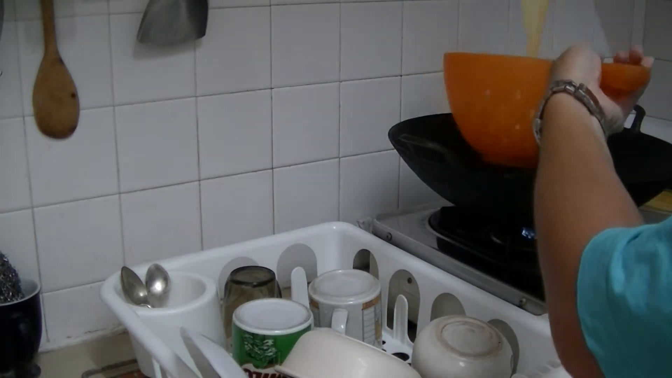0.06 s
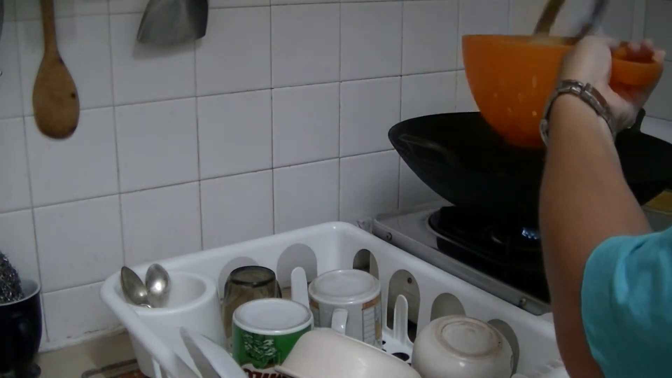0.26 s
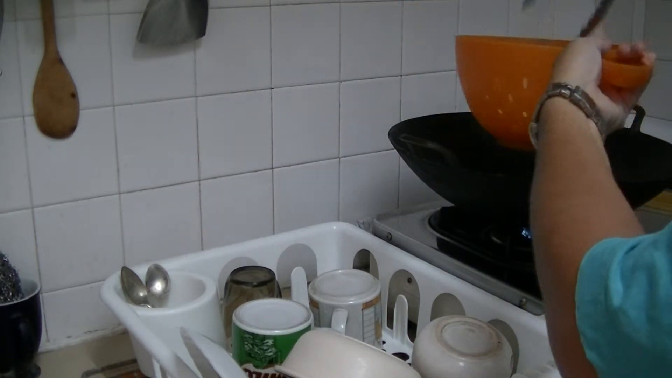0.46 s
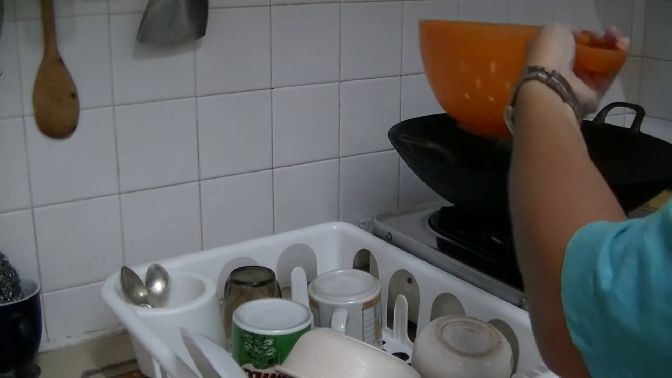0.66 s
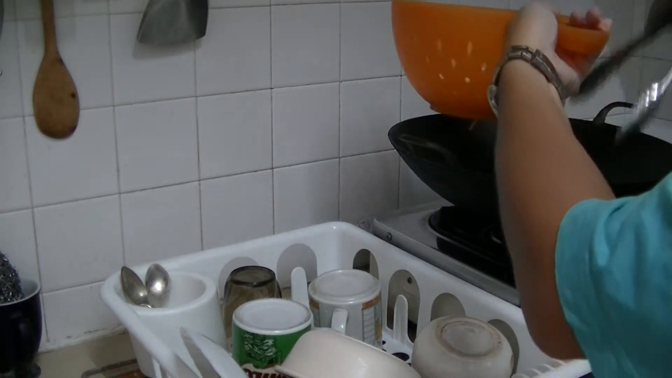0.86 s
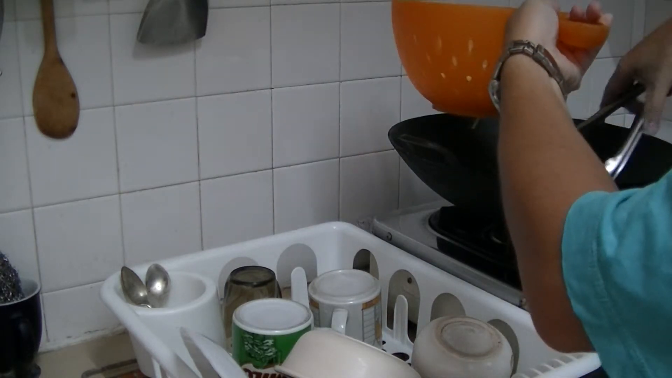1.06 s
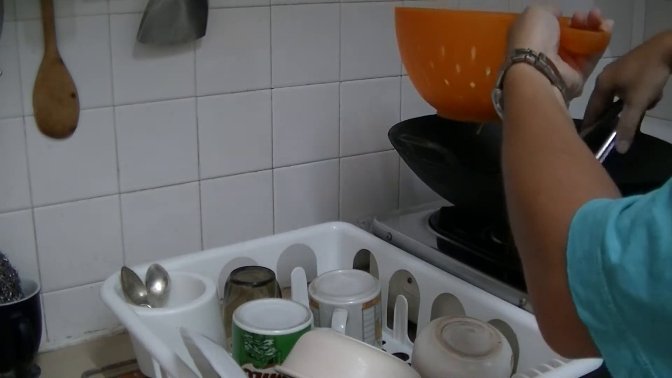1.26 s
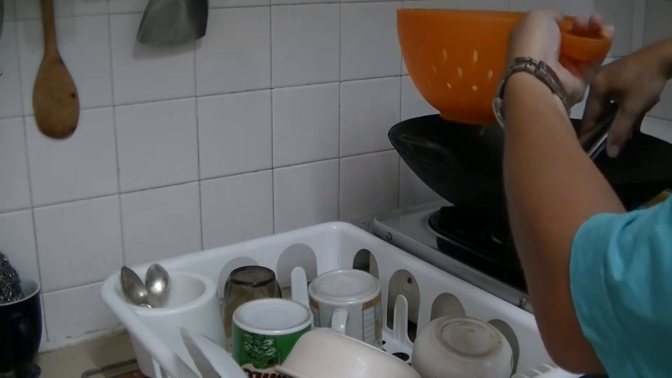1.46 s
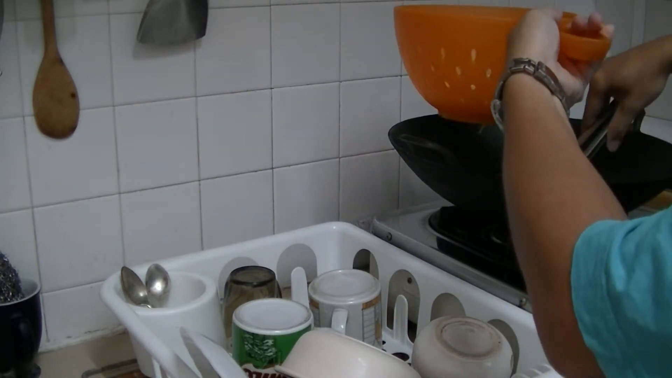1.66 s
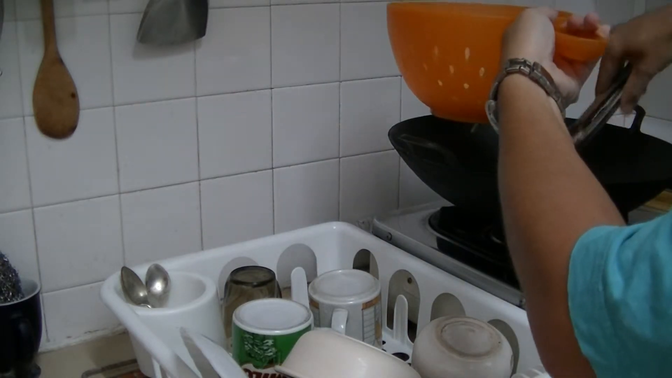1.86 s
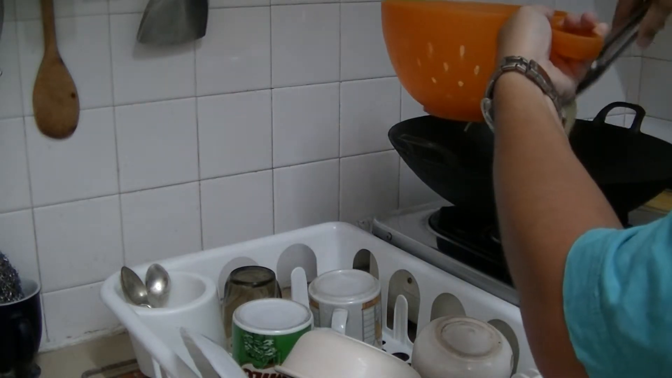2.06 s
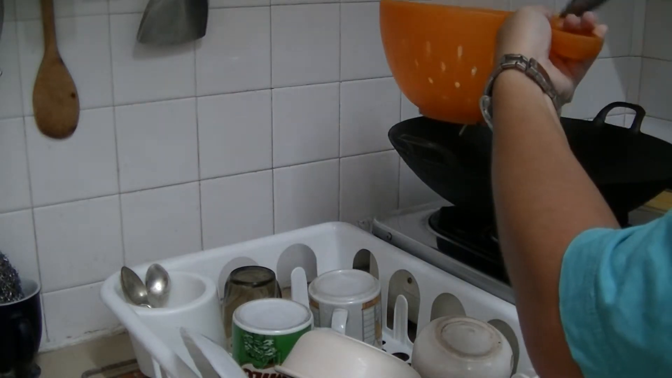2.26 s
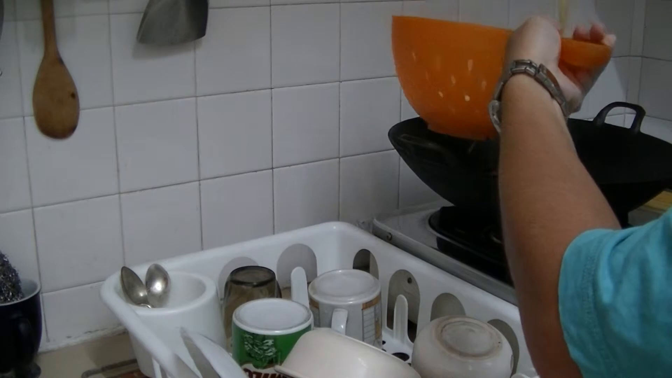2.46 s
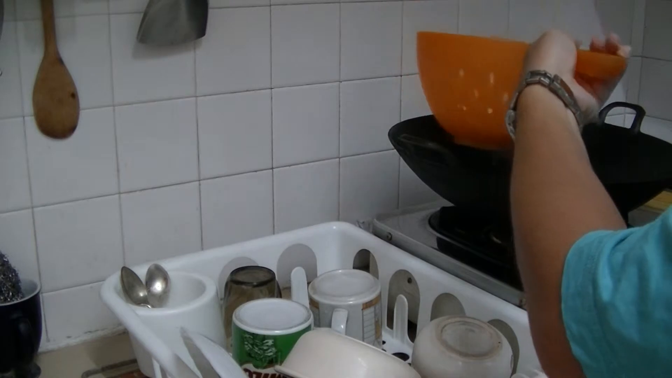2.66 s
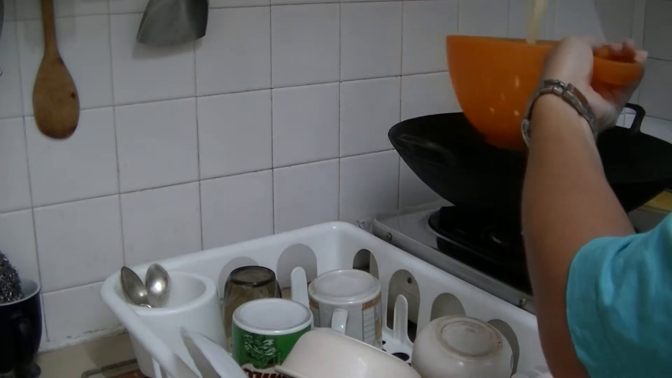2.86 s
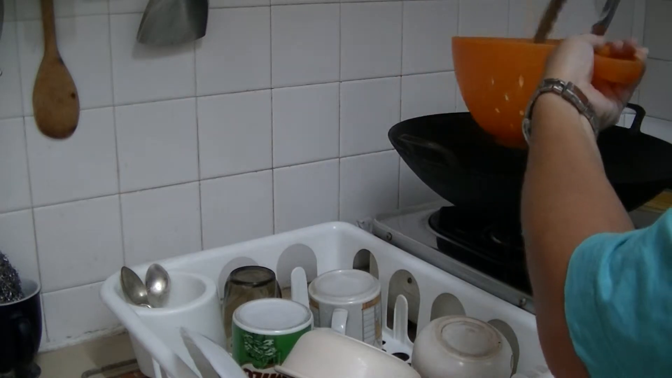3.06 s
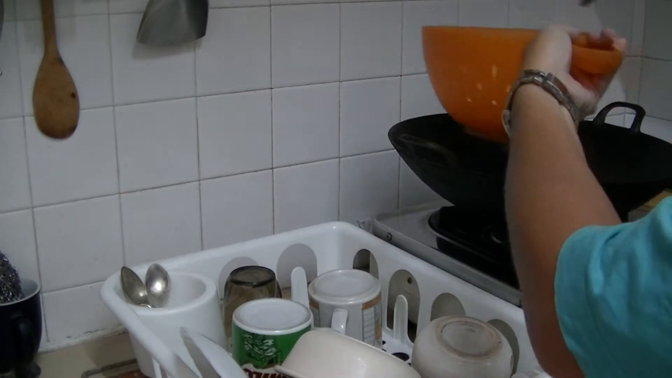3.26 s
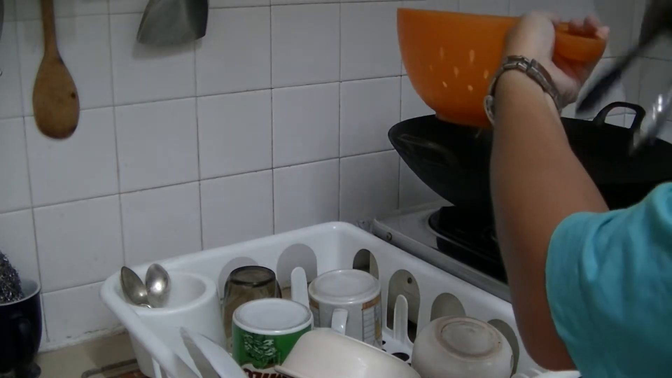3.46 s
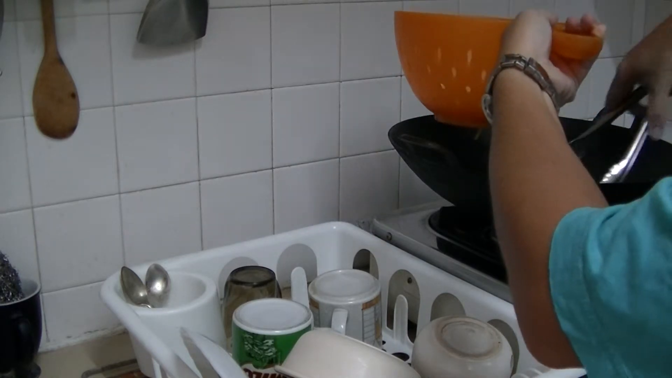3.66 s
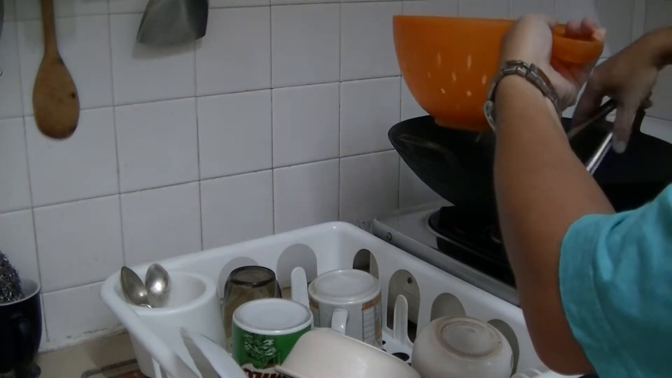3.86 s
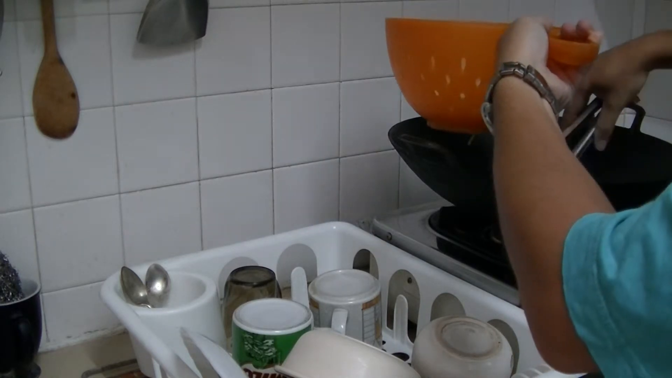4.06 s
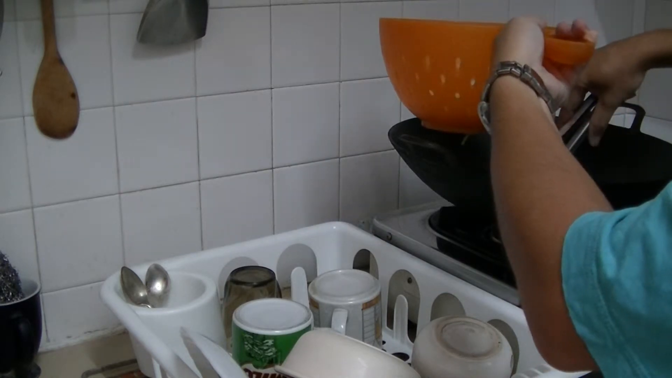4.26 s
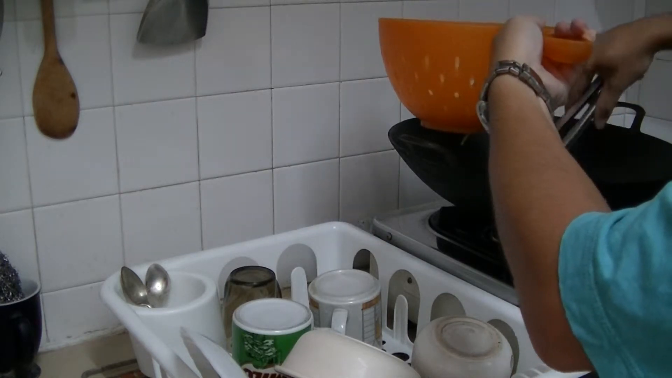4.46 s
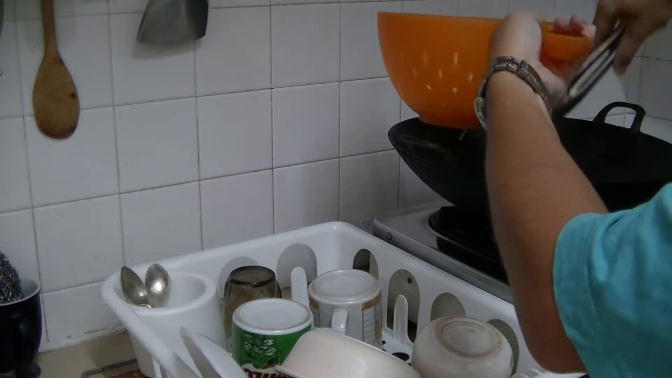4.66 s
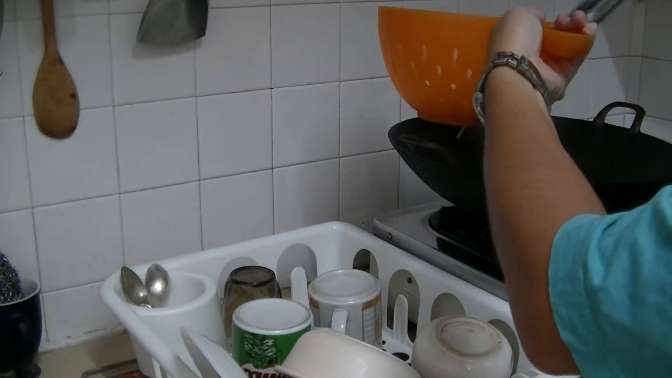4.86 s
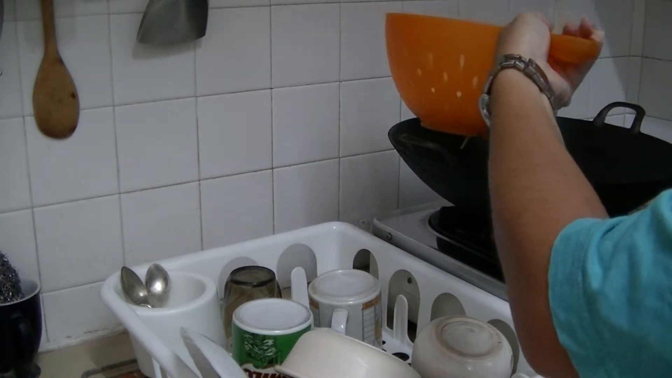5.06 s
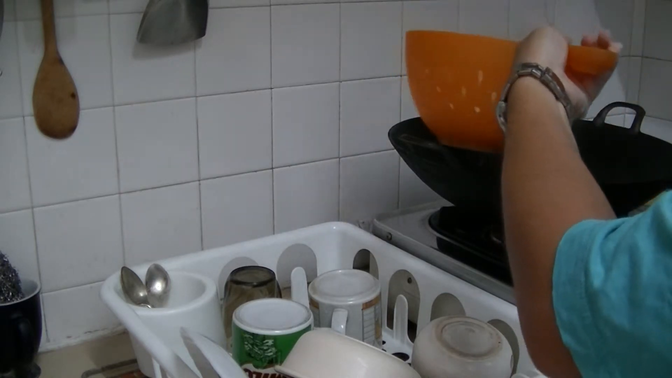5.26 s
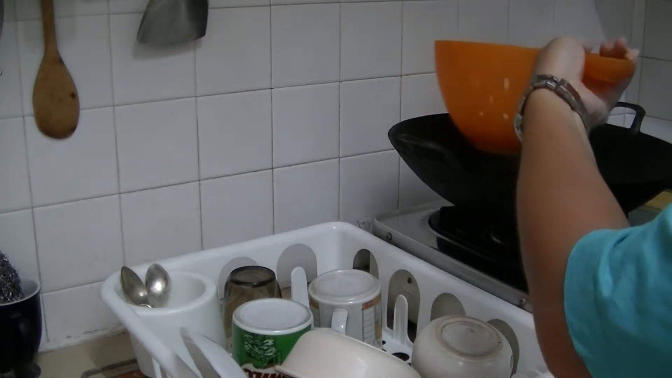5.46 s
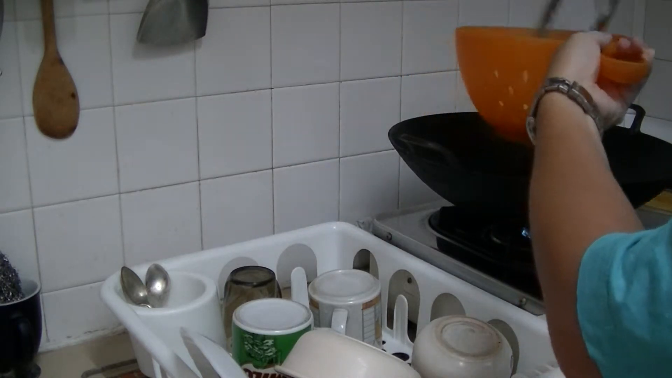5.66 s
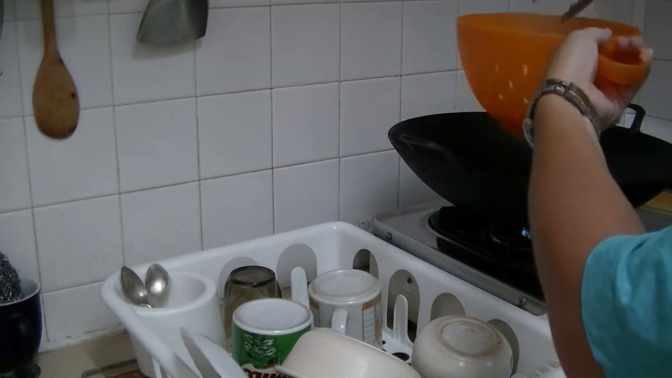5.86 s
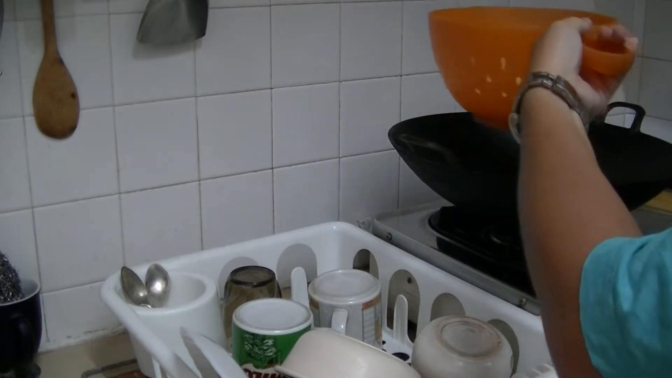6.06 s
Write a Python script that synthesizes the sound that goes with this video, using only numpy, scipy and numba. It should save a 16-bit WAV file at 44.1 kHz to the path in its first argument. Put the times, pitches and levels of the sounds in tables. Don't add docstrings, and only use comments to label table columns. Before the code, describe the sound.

Steel tongs strike an iron wok and scrape harshly down its wall twice, with light ticks and plastic knocks over a quiet kitchen simmer.

```python
import sys
import numpy as np
from scipy import signal
from scipy.fft import rfft, irfft
from scipy.io import wavfile
from scipy.ndimage import uniform_filter1d
from numba import njit

SR = 44100
rng = np.random.default_rng(int(sys.argv[2]) if len(sys.argv) > 2 else 0)


def to_wav(sig):
    pcm = np.clip(np.atleast_2d(sig), -1, 1) * 32767
    pcm = np.round(pcm).astype(np.int16)
    wavfile.write(sys.argv[1], SR, pcm.T)


def how_loud(loudness_db):
    steps = np.asarray(loudness_db, float) / 20
    return 10 ** steps


N = 269705


def rms_one(x):
    return x / np.sqrt(np.mean(x ** 2) + 1e-20)


def at_hz(points, hz):
    table = np.array(points)
    return np.interp(np.log(hz), np.log(table[:, 0]), table[:, 1])


def drift(rate_hz):
    pole = np.exp(-80 * np.pi * rate_hz / SR)
    white = rng.standard_normal(N // 40 + 2002)
    slow = signal.lfilter([1], [1, -2 * pole, pole * pole], white)[2000:]
    return np.interp(np.arange(N) / 40, np.arange(len(slow)), rms_one(slow))


def ring(clicks, hz, t60_s):
    pole = how_loud(-60 / (t60_s * SR))
    angle = 2 * np.pi * hz / SR
    return signal.lfilter([0, np.sin(angle)], [1, -2 * pole * np.cos(angle), pole * pole], clicks + 1e-18)


def resonances(x, peaks, patchy_db):
    total = 0
    for k, (hz, width_hz, level_db) in enumerate(peaks):
        t60_s = np.log(1000) / (np.pi * width_hz)
        patchy = x * how_loud(patchy_db * drift(6.9))
        total = total + (-1) ** k * how_loud(level_db) * np.sqrt(width_hz) * ring(patchy, hz, t60_s)
    return rms_one(total)


@njit
def gliding(x, c, r):
    y = np.zeros(len(x))
    for i in range(2, len(x)):
        y[i] = x[i] - x[i - 2] + 2 * r * c[i] * y[i - 1] - r * r * y[i - 2]
    return y


def glide(x, hz, width_hz):
    return rms_one(gliding(x, np.cos(2 * np.pi * hz / SR), np.exp(-np.pi * width_hz / SR)))


def bands(white, spectrum):
    edges = 16400 * 2 ** np.arange(-9.67, .1, 1 / 3)
    for k, (low, high) in enumerate(zip(edges, edges[1:])):
        hz = np.sqrt(low * high)
        if spectrum[0][0] < hz < spectrum[-1][0]:
            sos = signal.butter(2, [low, high], "band", fs=SR, output="sos")
            yield hz, how_loud(at_hz(spectrum, hz)) * signal.sosfilt(sos, white[k % 2])


def grains(per_s, spread_db):
    sizes = how_loud(spread_db * np.minimum(rng.exponential(1, N), 5)) * rng.choice([-1, 1], N)
    return rms_one(sizes * (rng.random(N) < per_s / SR))


def blow(hits, modes, ring_db, crack_db):
    # pitch_hz, density_db_per_hz
    crack_spectrum = [(180, -65), (300, -19), (828, -24.5), (1640, -26), (2880, -7.5), (3130, -7),
                      (3460, -5), (4090, -5), (4910, -5), (7570, -6), (16000, -13)]
    # pitch_hz, t60_s
    crack_t60 = [(500, 0.23), (2000, 0.25), (5000, 0.18), (12000, 0.043)]
    out, t = np.zeros(N), np.arange(SR // 2) / SR
    for start_s, peak_db, contact_s, hard_hz, damp_db in hits:
        chatter = np.exp(-2 * t / contact_s) * (rng.random(len(t)) < .03)
        chatter[0] = 1
        body = 0
        for hz, level_db, t60_s in modes:
            tone = ring(chatter * rng.standard_normal(len(t)), hz, t60_s)
            body = body + how_loud(level_db) * tone / np.abs(tone).max()
        white = rng.standard_normal((2, len(t)))
        crack = sum(b * how_loud(-60 * t / at_hz(crack_t60, hz)) for hz, b in bands(white, crack_spectrum))
        rise = 1 - np.exp(-t / 0.00099)
        mix = how_loud(ring_db) * body + how_loud(crack_db) * rise * crack / np.abs(crack).max()
        dulled = signal.lfilter(*signal.butter(2, min(hard_hz, 19000), fs=SR), mix)
        at = int(start_s * SR)
        out[at:at + len(t)] += how_loud(peak_db - damp_db * t) * dulled
    return out


def wok_blows():
    # start_s, peak_db, contact_s, hardness_hz, hand_damping_db_per_s
    first_place = [
        (1.138, -7, 0.015, 11700, 3),
        (1.2805, -15, 0.0026, 6250, 330),
    ]
    second_place = [
        (3.574, -6.5, 0.012, 12300, 0),
    ]
    # pitch_hz, level_db, t60_s
    first_modes = [(615, -14.5, 0.12), (683, -16.5, 0.089), (835, -13, 0.12), (1360, -28, 0.13),
                   (1990, -12, 0.076), (2287, -1.5, 0.066), (2600, -13, 0.16), (2805, -5, 0.11),
                   (3025, -14, .2), (3321, -9, .3), (3380, -8, .15), (3575, -3, .25), (3661, -8, .26),
                   (3801, -4, .29), (3869, -6, .2), (4167, -6, .3), (4430, -6, .2), (4522, -4, .12),
                   (4770, -6, .25), (5044, -10, .3), (5416, -10, .3), (5647, -11, .2), (6185, -14, .15),
                   (6670, -16, .15), (7246, -14, .18), (7424, -17, .18), (7725, -18, .16), (8129, -17, .16),
                   (8543, -29, 0.22), (9000, -31, 0.22)]
    second_modes = [(800, -26, .08), (1450, -26, .08), (2492, -18, .15), (2622, -22, .3), (3025, -16, .24),
                    (3553, -3, .16), (3644, -13, .25), (3795, -5.5, .22), (3870, -13, .2), (4140, -15, .17),
                    (4425, -20, .2), (4732, -14, .22), (4775, -12, .35), (4996, -5, .25), (5075, -9, .22),
                    (5125, -16, .3), (5362, -18, .3), (5599, -22, .3), (5862, -24, .25), (6078, -18, .12),
                    (6255, -12, .1), (7004, -24, .25), (7483, -20, .15), (7811, -22, .23), (8603, -22, .2),
                    (10060, -26, .18), (10650, -30, .2), (11280, -26, .11)]
    first = blow(first_place, first_modes, ring_db=-14.0, crack_db=-2)
    return first + blow(second_place, second_modes, ring_db=-9.5, crack_db=-3.0)


def bowl():
    # start_s, level_db, pitch_hz, t60_s
    low_rings = [
        (3.61, -53.5, 277, 1.1),
        (1.27, -56, 280, 0.39),
        (2.497, -55, 670, .25),
    ]
    t, out = np.arange(N) / SR, 0
    for start_s, level_db, hz, t60_s in low_rings:
        since = np.maximum(t - start_s, 0)
        swell = how_loud(level_db - 60 * since / t60_s) * (1 - np.exp(-since / 0.01))
        out = out + swell * np.sin(2 * np.pi * hz * since)
    return out


def stroke():
    # touch_s, bottom_s
    strokes = [
        (1.168, 1.456),
        (3.66, 4.02),
    ]
    # start_s, pressure_db, arm_share_db, spring_share_db
    catches = [(1.175, -30, -4, -17), (1.215, -36, 6, -11), (1.243, -49, 1, -8), (1.286, -31, 5.5, -24),
               (1.33, -39.5, -7, -20), (1.36, -38.5, -4, -12), (1.423, -34, 1.5, -7), (1.49, -46, 2, -5),
               (1.625, -52, 0, -1), (3.665, -35.5, -22, -13), (3.702, -32, 2, -8.5),
               (3.733, -27, -6.5, -26), (3.79, -33.5, -2, -16), (3.86, -31, 3.5, -14.5),
               (3.92, -39.5, -3, -5.5), (3.99, -34, -6, -9), (4.02, -35.5, 3.5, -12), (4.1, -44, -4, -0.5),
               (4.235, -51, -1.5, -15)]
    bite_db_per_s, ease_db_per_s = 498, 122
    lift_db_per_s = 58
    tong_damp_db_per_s = 132
    t = np.arange(N) / SR
    latest = strokes[::-1]
    begun = [t > start for start, _ in latest]
    way = np.select(begun, [(t - start) / (end - start) for start, end in latest])
    past = np.select(begun, [np.maximum(t - end, 0) for _, end in latest])
    s, pressure_db, arm_db, spring_db = np.transpose(catches)[:, :, None]
    fall_db = np.maximum(bite_db_per_s * (s - t), ease_db_per_s * (t - s))
    lift_db = lift_db_per_s * np.clip(np.minimum(past, t - s), 0, 1)
    grip = how_loud(pressure_db - fall_db - lift_db)
    held = np.select(begun, [s > start for start, _ in latest])
    damp_db = tong_damp_db_per_s * np.maximum(t - s, 0)
    shares_db = (0, arm_db - damp_db, spring_db - damp_db)
    pressures = [np.sqrt(np.sum((held * grip * how_loud(share)) ** 2, axis=0)) for share in shares_db]
    return np.clip(way, 0, 1), [uniform_filter1d(p, size=200) for p in pressures]


def drags():
    # pitch_hz, width_hz, level_db
    wall_peaks = [(1070, 14, -28), (1490, 83, -10.5), (1583, 34, -19), (2596, 37, -8), (2880, 60, -20),
                  (3100, 74, -19), (3127, 47, -4), (3347, 74, 0), (3350, 14, -6), (3640, 50, -5),
                  (3810, 60, -10), (4000, 60, -6), (4180, 60, -4), (4400, 60, -7), (4520, 50, -7),
                  (4760, 50, -5), (5020, 50, -8), (5200, 70, -10), (5430, 70, -10), (5650, 90, -13),
                  (5950, 90, -12), (6300, 90, -13), (6630, 90, -13), (6930, 70, -13), (7040, 140, -7.5),
                  (8000, 140, -31), (8900, 160, -14)]
    # pitch_hz, density_db_per_hz
    grit_spectrum = [(180, -74), (300, -23), (425, -24), (787, -9.5), (930, -9), (1660, -32), (2250, -13),
                     (2650, -0.5), (5610, -7.5), (11500, -25.5), (16000, -55)]
    way, (grit, on_arm, on_spring) = stroke()
    tremor = drift(23)
    arm_hz = (2333 - 220 * way ** 2.15) * (1 + 0.0098 * tremor)
    spring_hz = 870 - 165 * way
    slips = []
    for _ in range(2):
        fine = grains(9000, spread_db=1.0) * how_loud(2.4 * drift(18))
        rattle = grains(130, spread_db=4.5)
        slips.append(fine + how_loud(-9) * rattle)
    pressed = grit * slips[0]
    broad = rms_one(sum(b * how_loud(1.3 * drift(12)) for hz, b in bands(slips, grit_spectrum)))
    wall = resonances(pressed, wall_peaks, patchy_db=3) * np.sqrt(np.mean(pressed ** 2))
    arm = glide(glide(slips[0], arm_hz, width_hz=270), arm_hz, width_hz=160) * how_loud(2.4 * tremor)
    arm = arm + 0.35 * glide(slips[1], arm_hz * 1.07, width_hz=20)
    spring = glide(slips[1], spring_hz, width_hz=100)
    tongs = how_loud(-3.0) * on_arm * arm + how_loud(-3.5) * on_spring * spring
    return how_loud(-7.0) * wall + how_loud(-3.5) * grit * broad + tongs


def ticks():
    # start_s, peak_db, centre_hz
    tip_ticks = [(.25, -46, 7000), (.34, -45, 8000), (0.442, -37.5, 6200), (2.517, -35.5, 6500),
                 (2.59, -43, 11000), (3.1835, -31, 6800), (4.977, -54, 7000), (5.01, -38, 5300),
                 (5.1804, -41.5, 7400), (5.31, -49, 12000), (5.6597, -28.5, 5600), (5.6603, -35, 13500)]
    rim_ticks = [(2.3925, -33, 2220), (2.668, -42, 2410), (3.0218, -37, 4500), (4.225, -37, 2980),
                 (4.259, -39, 4000)]
    colander_knocks = [(2.495, -48, 760), (2.552, -40, 2360), (2.63, -54, 2100), (4.9761, -33, 3100),
                       (5.045, -43.5, 1600), (5.799, -49, 320)]
    # spread_octaves, t60_s
    touch_kinds = [
        (0.57, 0.1),
        (.68, 0.081),
        (0.24, .11),
    ]
    out, t = np.zeros(N), np.arange(SR // 4) / SR
    octaves = np.log2(np.arange(len(t) // 2 + 1) * SR / len(t) + 1)
    first_touch = 11.1 * (np.arange(len(t)) == SR // 1000)
    for touches, (spread, t60_s) in zip((tip_ticks, rim_ticks, colander_knocks), touch_kinds):
        for start_s, peak_db, hz in touches:
            colour = np.exp(-.5 * ((octaves - np.log2(hz)) / spread) ** 2) + 0.017 * (octaves > np.log2(500))
            touch = rng.standard_normal(len(t)) + first_touch
            snap = irfft(rfft(touch) * colour, len(t))
            snap = snap * how_loud(-60 * t / t60_s) * (1 - np.exp(-t / 0.0014))
            at = int(start_s * SR)
            out[at:at + len(t)] += (how_loud(peak_db) * snap / np.abs(snap).max())[:N - at]
    return out


def tip_snaps():
    # start_s, level_db
    snaps = [
        (3.1837, -43),
        (5.6597, -34.5),
    ]
    # pitch_hz, level_db, t60_s
    tip_modes = [(3800, -2, .035), (5200, -5, .035), (6110, 0, .045), (6390, -2, .07), (8600, -10, .08),
                 (9470, -8, .05)]
    out = np.zeros(N)
    for hz, mode_db, t60_s in tip_modes:
        clicks = np.zeros(N)
        for start_s, level_db in snaps:
            clicks[int(start_s * SR)] = how_loud(level_db + mode_db + rng.normal(0, 1))
        out += ring(clicks, hz, t60_s)
    return out


def stove():
    # pitch_hz, density_db_per_hz
    rumble_spectrum = [(12, -48), (20, -14), (168, -15), (240, -8), (290, -6.5), (312, 0), (343, -4),
                       (615, -1.5), (1210, -9), (1800, -14), (2340, -49), (3960, -120)]
    # pitch_hz, density_db_per_hz
    simmer_spectrum = [(650, -13), (1100, -1), (1200, -12), (1660, -4), (2160, -1.5), (2730, -10),
                       (3050, -0.5), (4150, -6), (4540, -8.5), (6320, -12), (15500, -25)]
    # pitch_hz, width_hz, level_db
    singing_peaks = [(2067, 40, 4.5), (2254, 53, 3), (2448, 6, 0), (2626, 20, -1.5), (3133, 23, 1),
                     (3430, 15, 2.5), (3890, 43, -3), (4400, 60, -1), (4670, 42, -11), (5420, 36, -3),
                     (5800, 130, -11), (7450, 64, -8.5)]
    # time_s, level_db
    vigour = [(0, -56), (1.5, -54.5), (3, -54.5), (3.5, -53), (4.4, -54.5), (5.3, -55), (6.12, -53)]
    t = np.arange(N) / SR
    rumble_db = -57.5 - 4.5 * (1 - np.exp(-t / 3))
    simmer_db = np.interp(t, *np.transpose(vigour))
    singing = resonances(grains(3000, spread_db=5.5), singing_peaks, patchy_db=1.0)
    simmer = bed_noise(simmer_spectrum, patchy_db=2.1) + how_loud(-5) * singing
    rumble = bed_noise(rumble_spectrum, patchy_db=1.1) * how_loud([[.6], [-.6]])
    return how_loud(rumble_db) * rumble + how_loud(simmer_db - 0.5) * simmer


def bed_noise(spectrum, patchy_db):
    # pitch_hz, likeness (0-1)
    likeness = [(60, 0.12), (150, 0.17), (380, 0.63), (950, 0.48), (2380, 0.92), (5980, 0.95),
                (15000, 0.94)]
    out, white = 0, rng.standard_normal((2, 2, N))
    for hz, (mid, side) in bands(white, spectrum):
        alike = np.clip(at_hz(likeness, hz), -1, 1)
        stereo = np.sqrt(1 + alike) * mid + np.sqrt(1 - alike) * side * [[1], [-1]]
        out = out + how_loud(patchy_db * drift(3.2)) * stereo
    return rms_one(out)


def bird():
    # start_s, length_s, pitch_hz, slide_hz, level_db
    whistles = [
        (.63, 0.1654, 1002, 58.5, -53),
        (.83, 0.18, 1426, 87, -58),
        (1.775, 0.17, 955, -7, -57),
        (5.29, 0.309, 1442, -35, -57),
        (5.529, 0.16, 1405, -16, -56),
    ]
    attack_s, release_s = 0.055, 0.1
    t, hz, level = np.arange(N) / SR, np.full(N, 1000.), 0
    for start_s, length_s, pitch_hz, slide_hz, level_db in whistles:
        slid_hz = pitch_hz + slide_hz * np.clip((t - start_s) / length_s, 0, 1)
        hz = np.where(t > start_s, slid_hz, hz)
        fade = np.minimum((t - start_s) / attack_s, (start_s + length_s - t) / release_s)
        level = level + how_loud(level_db) * np.clip(fade, 0, 1)
    tone = np.sin(2 * np.pi * np.cumsum(hz * (1 + .017 * drift(35))) / SR)
    blur = glide(rng.standard_normal(N), hz, width_hz=44)
    return level * (.8 * tone * how_loud(2.5 * drift(20)) + .7 * blur)


def hums():
    # pitch_hz, width_hz, level_db, stop_s
    motors = [
        (315, 9.9, -70, 9.),
        (161, 11, -79.5, 1.33),
        (143, 13, -89, 1.2),
    ]
    t, out = np.arange(N) / SR, 0
    for hz, width_hz, level_db, stop_s in motors:
        tone = glide(rng.standard_normal(N), np.full(N, 1. * hz), width_hz)
        out = out + how_loud(level_db) * tone / (1 + np.exp((t - stop_s) / 0.11))
    return out


def kitchen(x):
    # pitch_hz, t60_s
    kitchen_t60 = [(300, 0.26), (2000, 0.46), (8000, 0.25), (15000, 0.4)]
    t = np.arange(SR // 2) / SR
    flat = [(100, 0), (16500, 0)]
    white = rng.standard_normal((2, 2, len(t)))
    mid, side = sum(b * how_loud(-60 * t / at_hz(kitchen_t60, hz)) for hz, b in bands(white, flat))
    build_up = 1 - np.exp(-(t / 0.0085) ** 2)
    echoes = np.array([mid + 0.09 * side, mid - 0.14 * side]) * build_up
    return signal.fftconvolve(x[None], echoes / np.sqrt(np.sum(echoes[0] ** 2)), axes=1)[:, :N]


def scene():
    no_bass = signal.butter(4, 420, "high", fs=SR, output="sos")
    steel = signal.sosfilt(no_bass, wok_blows() + drags())
    near = steel + bowl() + ticks() + tip_snaps() + bird() + hums()
    bright = near + 0.61 * np.diff(near, prepend=0)
    tile = how_loud(-24.5) * np.roll(bright, 61) * [[1], [-1]]
    return near * how_loud([[.2], [-.2]]) + tile + how_loud(-7.0) * kitchen(near) + stove()


def roll_off(x):
    return signal.sosfilt(signal.butter(12, 16810, fs=SR, output="sos"), x)


def record(dry):
    top = signal.cheby2(14, 40, 16100, fs=SR, output="sos")
    rounded = 0.59 * np.tanh(dry / 0.61)
    return roll_off(signal.sosfilt(top, rounded))


dry = scene()
out = record(dry)
to_wav(out)
```